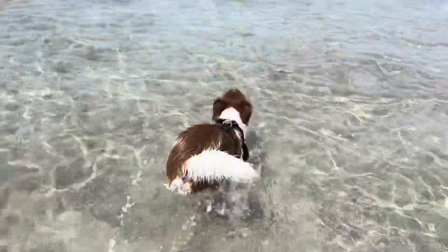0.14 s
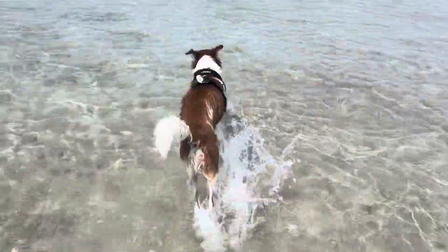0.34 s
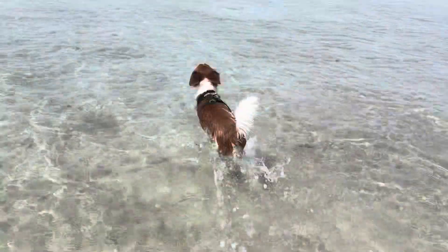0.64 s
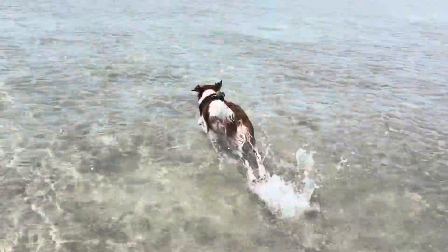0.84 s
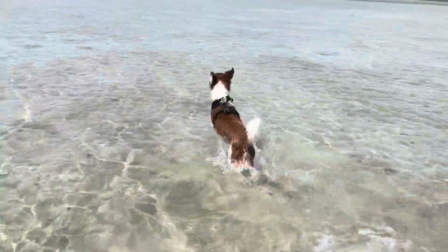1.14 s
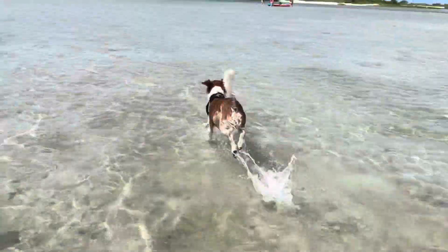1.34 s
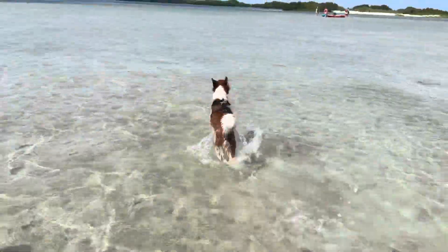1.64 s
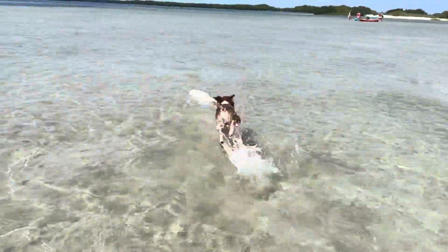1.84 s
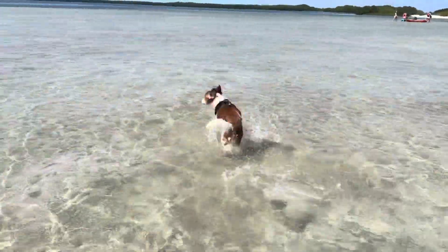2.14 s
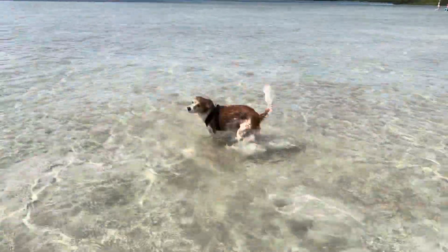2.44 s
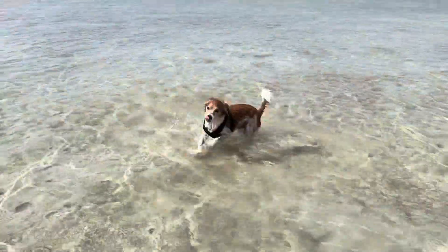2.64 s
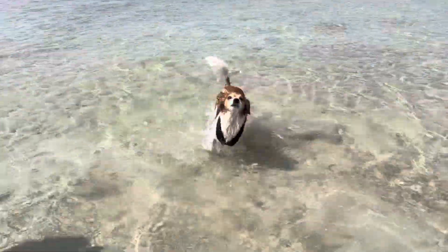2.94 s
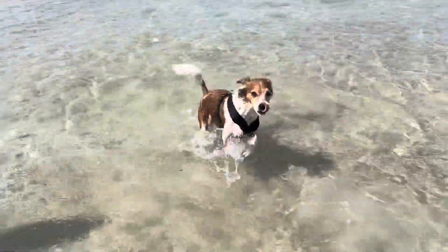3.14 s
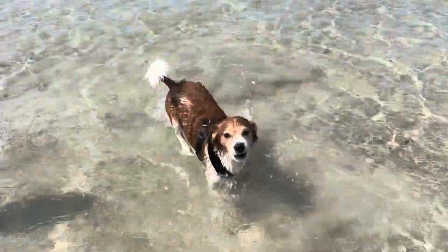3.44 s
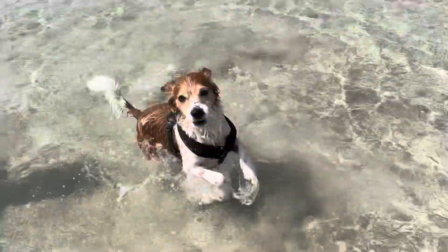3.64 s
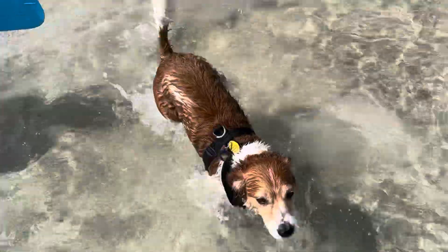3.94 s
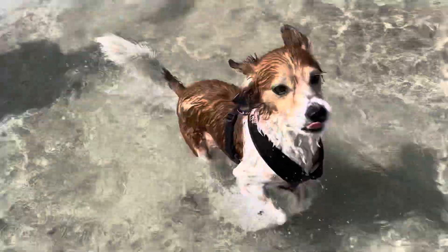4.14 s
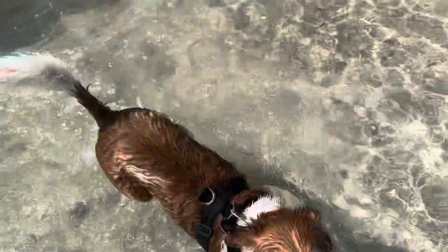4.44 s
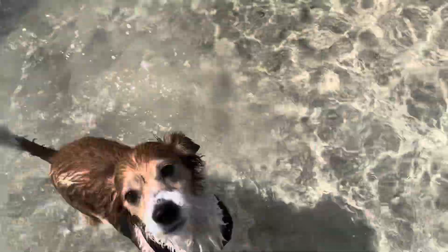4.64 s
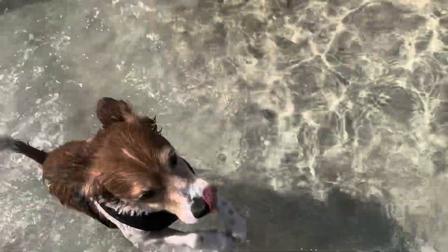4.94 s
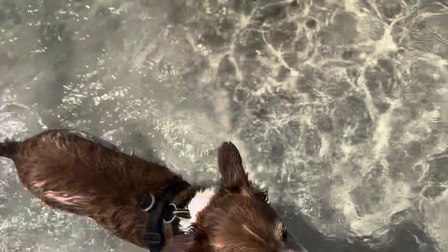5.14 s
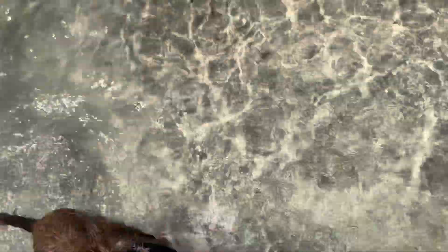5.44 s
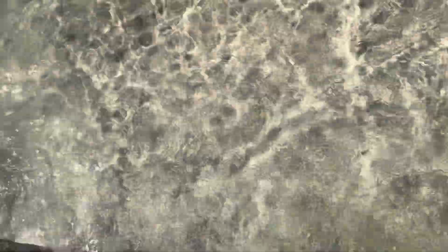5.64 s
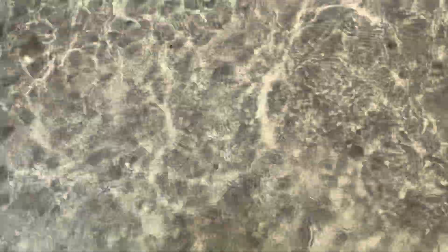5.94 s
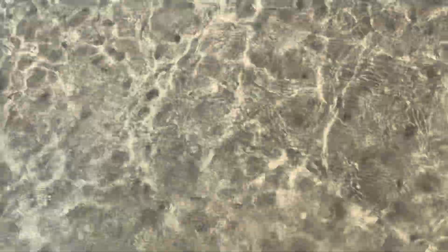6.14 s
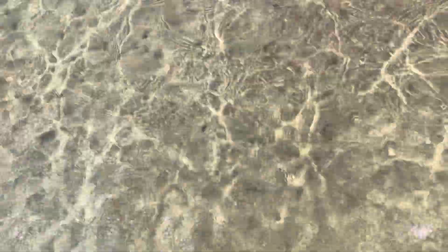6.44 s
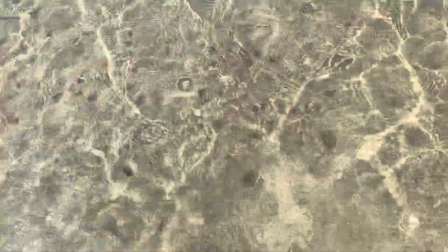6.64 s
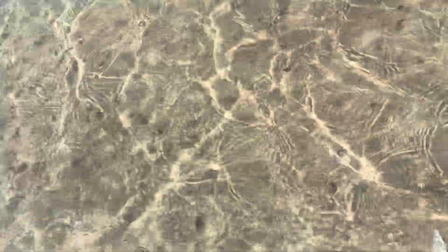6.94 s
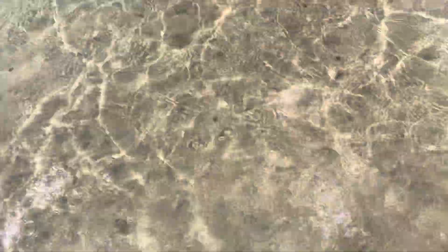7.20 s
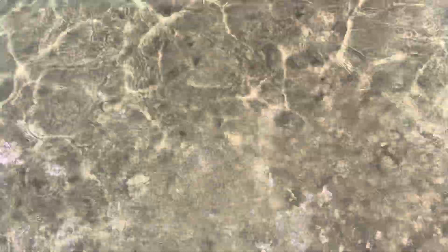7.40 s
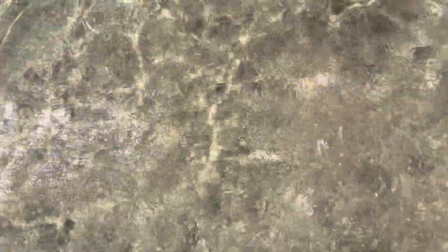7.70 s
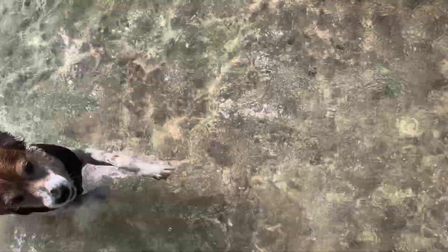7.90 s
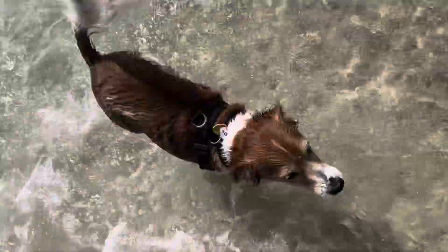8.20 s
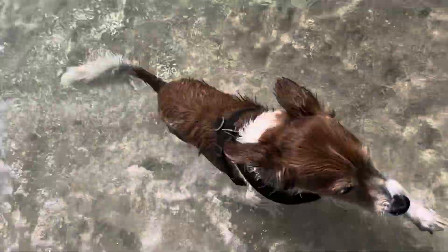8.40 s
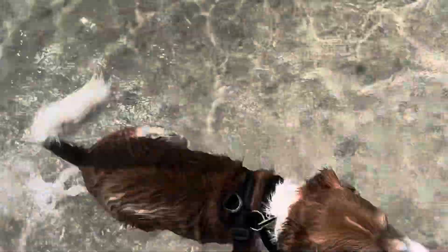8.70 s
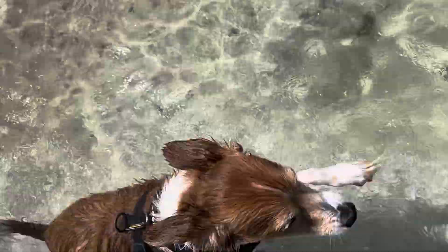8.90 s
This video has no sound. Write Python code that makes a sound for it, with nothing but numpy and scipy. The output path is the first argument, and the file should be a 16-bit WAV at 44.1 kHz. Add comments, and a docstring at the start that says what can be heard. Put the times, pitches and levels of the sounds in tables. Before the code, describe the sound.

A paw splash and a short low gust on the microphone open the scene. From 0.3 to 1.5 s a small dog trots through shallow sea water: quick gurgling sloshes, hollow plops rising slightly in pitch, light hissing spray, with little wind. Around 2 s the steps thin out to soft swishes. At 2.7 s a strong gust hits with hard, dull thumps, and rumbling, buffeting wind continues past 3.7 s. From 3.4 to 5.4 s strides splash closer and brighter, with plops and tiny drops; another heavy gust thumps at about 4.7 s. From 5.5 to 7.6 s regular, spray-rich strides alternate with lapping over steady low wind. Near 8 s gusts thump again, and from 8.1 to 8.8 s the splashing is densest, with crowded round plops and bright patter. Wet steps and lapping continue to the end at 9 s. Open air, no echo.

```python
"""A paw splash under a gust of wind opens; a small dog then trots on through shallow sea water.
Strides: swarms of ringing bubbles over surging noise, a low slosh and a bright spray that patters back.
Plops and drops: single air pockets, each a noisy slap and a short ring climbing in pitch.
Wind: coloured noise in gusts over a breeze, with single low thumps on the ports of a stereo microphone."""
import sys
import numpy as np
from scipy import signal
from scipy.fft import rfft, irfft
from scipy.io import wavfile

SR = 44100
rng = np.random.default_rng(int(sys.argv[2]) if len(sys.argv) > 2 else 0)


def master_out(mix):
    """Clip the mix to full scale and print it as 16-bit PCM to the path in sys.argv[1]."""
    frames = np.transpose(np.atleast_2d(mix))
    ceiling = np.clip(frames, -1, 1)
    pcm = np.round(ceiling * 32767).astype(np.int16)
    wavfile.write(sys.argv[1], SR, pcm)


N = 399546
HZ = np.maximum(np.fft.rfftfreq(N, 1 / SR), 1)  # transform grid, kept above 0 for the logarithm

# breeze between gusts: (time [s], rumble [dB], buffeting [dB])
BREEZE_CURVE = [(0, -36, -33), (.35, -33.5, -36), (.6, -46, -48.5), (1.3, -51, -36.5), (1.5, -42, -43.5),
                (2.4, -37.5, -33), (2.9, -28.5, -26.5), (4.2, -28.5, -31), (5.1, -27, -30), (5.6, -28, -33),
                (6.299, -30, -32.5), (7.501, -30, -39.5), (7.9, -37, -38), (8.3, -36, -28),
                (9.06, -29.5, -46)]
# gusts: (full from [s], build [s per 10 dB, floored in wind()], hold [s], rumble [dB], buffeting [dB])
GUST_EVENTS = [(0.104, 0, 0.012, -26, -24), (0.17, 0.2, 0.1, -25, -28), (0.763, -0.14, 0.019, -48, -31),
               (1.14, 0.2, 0.095, -44, -30.5), (1.676, 0.1, 0.025, -36, -30),
               (1.843, 0.5, 0.14, -39, -37.5), (2.493, -0.2, 0.03, -38, -29.5),
               (2.696, 0.05, 0.044, -23, -19), (2.924, 0, 0.12, -21, -24.5),
               (3.106, 0.05, 0.11, -28, -20.5), (3.301, 0, 0.2, -22, -41), (3.73, -0.01, 0.019, -22, -18.5),
               (3.947, 0.5, 0.027, -37, -29), (4.43, 0.2, 0.045, -22.5, -31),
               (4.688, -0.03, 0.024, -18.5, -19), (4.833, 0.2, 0.04, -22.5, -24),
               (5.366, 0.2, 0.015, -36, -25), (5.487, -3.5, 0.014, -21, -30), (5.827, 0.1, 0.18, -23, -27),
               (6.997, 0.13, 0.022, -24, -26.5), (7.725, 0.18, 0.028, -21, -25),
               (8.033, 0.07, 0.12, -20, -21.5), (8.265, 0.05, 0.087, -22, -20),
               (8.386, -0.2, 0.23, -22.5, -21.5), (8.707, 0.2, 0.047, -26, -28),
               (8.843, -0.9, 0.19, -25.5, -28)]
# wind spectra, rms set to 1 in use: (frequency [Hz], relative density [dB])
RUMBLE_SPECTRUM = [(22, -28), (32, -21), (45, 2), (80, 5), (130, -2.5), (250, -21)]
BUFFET_SPECTRUM = [(70, -15), (150, 0), (280, -1.5), (500, -4.5), (900, -16.5), (2000, -29)]
# single eddies thumping on the ports: (start [s], envelope peak before ports [dB], pitch [Hz])
THUMP_EVENTS = [(0.112, -13, 170), (0.125, -18.5, 198), (0.261, -19, 177), (2.689, -7.5, 304),
                (2.696, -2, 235), (2.712, -9, 200), (2.738, -9, 350), (2.877, -17, 240), (2.921, -13, 180),
                (2.964, -11.5, 160), (3.114, -13, 91.5), (3.189, -16, 128), (3.228, -9.5, 228),
                (3.281, -14, 187), (3.47, -13.5, 151), (3.735, -10, 94), (3.939, -17, 95),
                (4.822, -17, 198), (4.853, -7.5, 131), (8.025, -6, 107), (8.084, -6.5, 330),
                (8.101, -13, 107), (8.255, -9.5, 101), (8.266, -9, 110), (8.323, -10, 363),
                (8.442, -11.5, 368), (8.51, -19, 238), (8.572, -15, 105), (8.701, -18, 292),
                (8.891, -17, 326)]
# water lapping between strides, trims added in strides(): (time [s], slosh [relative dB], spray [relative dB])
LAPPING_CURVE = [(0, -37, -40), (1.2, -36, -46), (2.9, -34, -47.5), (3.4, -35, -49), (5.0, -36.5, -43),
                 (6.6, -30, -36.5), (7.3, -34.5, -41), (9.06, -31, -40)]
# strides, trims added in strides(): (full from [s], length [s], slosh [relative dB], spray [relative dB])
STRIDE_EVENTS = [(0.086, 0.052, -30.5, -34.5), (0.204, 0.13, -30, -42), (0.351, 0.03, -25.5, -36.5),
                 (0.628, 0.2, -31, -39.5), (0.848, 0.044, -39, -41), (0.968, 0.026, -32.5, -46),
                 (1.054, 0.063, -30, -38), (1.227, 0.066, -33.5, -56), (1.702, 0.019, -30, -41),
                 (1.496, 0.13, -29, -36.5), (2.053, 0.14, -29.5, -36.5), (2.656, 0.19, -34.5, -38.5),
                 (3.068, 0.036, -29, -55), (3.32, 0.045, -28.5, -37.5), (3.22, 0.19, -30, -32.5),
                 (3.418, 0.17, -33, -38.5), (3.626, 0.2, -31.5, -36.5), (3.879, 0.088, -32.5, -35),
                 (4.23, 0.22, -29, -31.5), (4.405, 0.11, -30.5, -34), (4.646, 0.16, -30, -38.5),
                 (4.848, .12, -35, -36), (5.242, 0.15, -31.5, -52), (5.478, 0.24, -31.5, -33.5),
                 (5.728, 0.089, -31, -58), (6.098, 0.23, -31.5, -33), (6.343, 0.053, -27, -34.5),
                 (6.543, 0.14, -36, -35), (6.817, 0.062, -32, -48), (7.097, 0.17, -32, -32),
                 (7.518, 0.15, -32, -34.5), (7.723, 0.051, -31, -33.5), (7.976, 0.24, -32.5, -34),
                 (8.109, 0.11, -28, -34.5), (8.48, .14, -29.5, -30.5), (8.591, 0.06, -27.5, -30),
                 (8.695, 0.061, -34.5, -37), (9.046, 0.14, -37, -32.5)]
# water spectra, shaping bubbles and hiss, rms set to 1 in use: (frequency [Hz], relative gain [dB])
SLOSH_SPECTRUM = [(200, -29), (400, -10.5), (700, -5.5), (1200, -4.5), (2000, -6), (2700, -13), (4000, -19)]
SPRAY_SPECTRUM = [(1200, -20), (2500, 0), (4000, -1.5), (6200, -6), (8500, -3), (10400, -1), (12000, -6.5),
                  (13500, -6.5), (15300, -4)]
# air pockets closed by a paw: (start [s], level before gain_db [dB], initial pitch [Hz], slap re ring [dB])
PLOP_EVENTS = [(0.097, -14, 920, 2.5), (0.16, -19, 899, 5), (0.177, -4, 574, -0.5), (0.334, -12, 1040, -7),
               (0.346, -6, 960, -10.5), (0.555, -9, 650, -3.5), (0.609, -6, 540, -24),
               (0.622, -6, 730, -15), (0.636, -6, 684, -7), (0.821, -12.5, 1190, -26),
               (0.854, -12, 1250, -8), (0.952, -6, 550, -23), (0.971, -9, 610, -3.5), (1.027, -9, 610, -16),
               (1.036, -12, 2100, -14), (1.039, -10, 604, 1), (1.202, -14, 635, -16),
               (1.213, -8.5, 530, -15), (1.332, -14, 1700, -13), (1.436, -17.5, 1000, 2),
               (1.471, -8.5, 1400, -9.5), (1.492, -11, 537, -11), (1.509, -8, 526, -8),
               (1.684, -15, 550, -9), (1.951, -5, 790, -13), (2.789, -10.5, 900, -8),
               (3.059, -12, 1140, -9), (2.907, -5.5, 507, -16.5), (3.011, -5.5, 537, -25),
               (3.415, -10, 674, 4), (3.737, -6.5, 590, -12), (3.778, -11.5, 660, -9.5),
               (3.828, -9, 587, -16), (3.879, -11, 1890, -15), (3.867, -7, 535, -4.5),
               (3.897, -14, 1500, -5), (3.921, -6.5, 540, -1.5), (3.954, -1, 690, -6),
               (4.384, -18, 1520, -9), (4.399, -9, 606, 4), (4.456, -7, 1600, -8), (4.464, -6, 1190, -8.5),
               (4.784, -11, 543, 3.5), (4.811, -5, 645, -2.5), (4.934, -11, 551, -5.5),
               (5.107, -6, 536, -7.5), (5.162, -11.5, 1250, -6), (5.199, -2.5, 1930, -18),
               (5.397, -12, 607, 0), (5.716, -5.5, 875, -22), (5.84, -6.5, 660, -7),
               (5.985, -10.5, 700, -5), (5.915, -6.5, 616, -6), (6.056, -14, 470, -14),
               (6.197, -11.5, 520, -15), (6.292, -4, 510, -6), (6.332, -5, 640, -12),
               (6.353, -13.5, 1490, 3), (6.401, -15, 1060, -2), (6.809, -14, 1140, -11),
               (7.729, -6.5, 776, -20), (8.085, -2, 533, -6), (8.123, -8.5, 495, -3),
               (8.319, -5, 501, -3.5), (8.336, -2, 556, -10), (8.345, -7, 630, -19),
               (8.384, -0.5, 597, -8.5), (8.429, -3, 520, -13), (8.442, -9, 524, 2), (8.547, -6, 644, -4),
               (8.58, -2.5, 546, -10), (8.594, -0.5, 570, -19), (8.613, -1, 700, -15),
               (8.694, -12, 540, -2), (8.739, -2, 497, -23), (8.788, -8, 1810, -22), (8.947, -2.5, 670, -9),
               (8.999, -7, 530, -5)]
# drops falling back close by: (start [s], level before gain_db [dB], initial pitch [Hz])
DROP_EVENTS = [(0.157, -11, 4360), (0.4727, -19, 2840), (1.976, -20, 3080), (3.4141, -15, 3480),
               (4.2058, -13, 8100), (4.2644, -7.5, 3220), (4.4, -13, 5000), (4.82, -20, 3420),
               (5.358, -16, 3100), (5.6582, -18, 3900), (5.88, -14, 2400), (6.172, -13, 3130),
               (6.35, -9, 4770), (6.8103, -13.5, 3930), (7.134, -11.5, 4100), (7.9794, -11, 6900),
               (7.9982, -15, 3200), (8.1053, -11, 3730), (8.5096, -11, 7060)]
# stereo balance: (frequency [Hz], left re right [dB], likeness [0-1])
PORT_BALANCE = [(60, -1, 0.92), (250, 0.5, 0.72), (450, -.5, 0.67), (1100, 0.5, 0.24), (1700, 1.5, 0.49),
                (2490, 2, 0.65), (3240, -5.5, 0), (3530, -3.5, 0.2), (5000, -4.5, 0.17), (5630, -2, 0),
                (7740, -1.5, 1), (10700, 0.5, 1)]
# set phase difference by frequency: (frequency [Hz], left against right [rad])
STEREO_PHASE = [(60, -.1), (1700, .1), (2600, -2.8), (3300, -.3), (8000, .3), (9300, 2.9), (10200, 3.3),
                (11900, 6.2), (13000, 6.5), (13900, 9.1), (15000, 9.4)]

GUST_FALL_S_PER_10_DB = 0.02
# shares of the stride length: 10 dB up, level, 10 dB down
STRIDE_RISE, STRIDE_HOLD, STRIDE_FALL = 1.1, 0.21, 0.68
PLOP_CYCLES_AT_600_HZ = 1.37  # nominal swell, scattered pocket by pocket
PLOP_PITCH_POWER = .85  # higher pockets ring more cycles
SPATTER_S = 0.012  # 1/e time of the spatter after a slap
STOPBAND_HZ = 16120


def from_db(db):
    """Decibels to amplitude gain."""
    return 10 ** (np.asarray(db) / 20)


def rms_one(x):
    """Scale to unit rms."""
    return x / np.sqrt(np.mean(x ** 2) + 1e-20)


def in_time(rows):
    """Columns of a curve table, sample by sample."""
    s, *columns = np.transpose(rows)
    return [np.interp(np.arange(N) / SR, s, column) for column in columns]


def in_hz(rows):
    """Columns of a frequency table on the transform grid, log-frequency interpolation."""
    hz, *columns = np.transpose(rows)
    return [np.interp(np.log(HZ), np.log(hz), column) for column in columns]


def colour(x, spectrum):
    """Shape by a spectrum, cut off beyond its ends; rms 1."""
    inside = (HZ > .7 * spectrum[0][0]) & (HZ < 1.5 * spectrum[-1][0])
    gain = from_db(in_hz(spectrum)[0]) * inside
    return rms_one(irfft(rfft(x) * gain, N))


def drift(corner_hz):
    """Slow chance: noise through two equal one-pole low-passes at SR / 20; rms 1."""
    r = np.exp(-40 * np.pi * corner_hz / SR)
    noise = rng.standard_normal(N // 20 + 2002)
    slow = signal.lfilter([1], [1, -2 * r, r * r], noise)[2000:]  # settling dropped
    return np.interp(np.arange(N) / 20, np.arange(len(slow)), rms_one(slow))


def swells(s, rise_s, hold_s, fall_s, levels_db, calm):
    """Event levels climb, hold and fall linearly in dB; powers add to a calm background."""
    t = np.arange(0, N + 32, 32)[:, None] / SR
    rising = (s - t) / rise_s
    falling = (t - s - hold_s) / fall_s
    below_db = 10 * np.maximum(0, np.maximum(rising, falling))
    totals_db = []
    for event_db, calm_db in zip(levels_db, in_time(calm)):
        coarse = np.sum(from_db(event_db - below_db) ** 2, axis=1)
        power = np.interp(np.arange(N) / SR, t[:, 0], coarse)
        totals_db.append(10 * np.log10(power + from_db(calm_db) ** 2))
    return totals_db


def thumps(cycles_at_150_hz):
    """A pressure lump of about a cycle or two, with a random share in the scattered view."""
    out, t = np.zeros((2, N + SR)), np.arange(4000) / SR
    chance = rng.random((len(THUMP_EVENTS), 2))
    for (s, peak_db, hz), (turn, lean) in zip(THUMP_EVENTS, chance):
        swell = t * hz / (cycles_at_150_hz * (hz / 150) ** 0.48)  # 1 at the envelope peak
        envelope = swell ** 2 * np.exp(2 - 2 * swell)
        lump = envelope * np.sin(2 * np.pi * (t * hz + turn))
        at = int(s * SR)
        out[:, at:at + 4000] += from_db(peak_db) * lump * [[1], [lean - .5]]
    return out[:, :N]


def wind():
    """Eddies hit the ports in lumps; the brighter buffeting is the lumpier."""
    s, build_s, hold_s, *levels_db = np.transpose(GUST_EVENTS)
    build_s = np.maximum(build_s, .005)
    rumble_db, buffet_db = swells(s, build_s, hold_s, GUST_FALL_S_PER_10_DB, levels_db, BREEZE_CURVE)
    eddies = drift(20)
    rumble_lumps = from_db(1.5 * eddies)
    buffet_lumps = from_db(np.minimum(3.0 * eddies + 3.3 * drift(58), 6.5))
    rumble = colour(rng.standard_normal((2, N)) * rumble_lumps, RUMBLE_SPECTRUM)
    buffet = colour(rng.standard_normal((2, N)) * buffet_lumps, BUFFET_SPECTRUM)
    gusts = from_db(rumble_db) * rumble + from_db(buffet_db) * buffet
    return gusts + thumps(cycles_at_150_hz=0.84)


def splats(per_s, decay_s):
    """Sheets of water land at random: a sudden rise, then exponential decay, capped."""
    landed = (rng.random(N) < per_s / SR) * np.minimum(rng.exponential(1, N), 1.6)
    dying = signal.lfilter([1], [1, -np.exp(-1 / (decay_s * SR))], landed)
    return np.minimum(dying, 1.6)


def bubbles(per_s, low_hz, high_hz, cycles, spread_db, count):
    """Random births ring a bank of resonators; two views, the shared and the scattered one."""
    born = rng.random(N) < per_s / SR
    sizes = born * from_db(spread_db * np.minimum(rng.exponential(1, N), 4))
    signs = rng.choice([-1, 1], (2, N))
    dealt = rng.integers(0, count, N)
    out = np.zeros((2, N))
    for k, hz in enumerate(np.geomspace(low_hz, high_hz, count)):
        r = from_db(-60 * hz / (cycles * SR))  # pole decays 60 dB in the given cycles
        w = 2 * np.pi * hz / SR
        resonance = [1 - r * r, 0, r * r - 1, 1, -2 * r * np.cos(w), r * r]
        clicks = sizes * signs * (dealt == k) + 1e-18
        out += signal.sosfilt([resonance, resonance], clicks) / np.sqrt(hz)  # twice: a soft start
    return rms_one(out)


def churn(level_db, spectrum, grains, bursts, hiss_db, surge_db, patchy_db):
    """Bubbles over the hiss of countless finer ones, which surges, bursts and flickers band by band."""
    white, surge = rfft(rng.standard_normal((2, N))), drift(13.0)
    edges = np.geomspace(spectrum[0][0] / 2, spectrum[-1][0] * 2, 9)
    hiss = np.zeros((2, N))
    for low, high in zip(edges, edges[1:]):
        band = irfft(white * (HZ >= low) * (HZ < high), N)
        hiss += band * from_db(surge_db * surge + patchy_db * drift(22.4))
    mix = grains + from_db(hiss_db) * hiss * (1 + bursts)
    return from_db(level_db) * colour(mix, spectrum)


def pockets(rows, rings, rise, slap_s, gain_db):
    """A closing air pocket: a noisy slap with spatter, and a ring that swells and climbs in pitch."""
    out, t = np.zeros((2, N + SR)), np.arange(2000) / SR
    chance = rng.random((len(rows), 3))
    noises = rng.standard_normal((len(rows), 2000))
    slap_envelope = t / slap_s * np.exp(1 - t / slap_s)
    spatter_envelope = 0.25 * (1 - np.exp(-t / slap_s)) * np.exp(-t / SPATTER_S)
    for (s, peak_db, hz, slap_db), cycles, (turn, lean, size), noise in zip(rows, rings, chance, noises):
        swell = t * hz / (cycles * (0.61 + 0.5 * size))  # 1 at the envelope peak
        phase = t * hz * (1 + rise * swell) + turn
        ring = swell * np.exp(1 - swell) * np.sin(2 * np.pi * phase)
        band = signal.butter(2, [hz, min(3.1 * hz, 15000)], "band", fs=SR, output="sos")
        slap = rms_one(signal.sosfilt(band, noise)) * (slap_envelope + spatter_envelope)
        pocket = from_db(peak_db + gain_db) * (ring + from_db(slap_db) * slap)
        at = int(s * SR)
        out[:, at:at + 2000] += pocket * [[1], [lean - .5]]
    return out[:, :N]


def strides():
    """Each stride and the lapping between: slosh and spray of bubbles, hiss and landing sheets."""
    s, length_s, *levels_db = np.transpose(STRIDE_EVENTS)
    slosh_db, spray_db = swells(s, STRIDE_RISE * length_s, STRIDE_HOLD * length_s,
                                STRIDE_FALL * length_s, levels_db, LAPPING_CURVE)
    swarms = from_db(4 * drift(14))  # bubbles come in swarms
    gurgle_per_s = 1200 * from_db(slosh_db + 33) * swarms
    patter_per_s = 1200 * from_db(spray_db + 40.5)
    gurgle = bubbles(gurgle_per_s, 250, 2600, cycles=19.0, spread_db=3.3, count=24)
    patter = bubbles(patter_per_s, 2016, 13940, cycles=22.6, spread_db=5.0, count=16)
    landings = splats(per_s=75, decay_s=0.0056)
    slosh = churn(slosh_db + 1.2, SLOSH_SPECTRUM, gurgle, .9 * landings,
                  hiss_db=1.0, surge_db=1.4, patchy_db=2.0)
    spray = churn(spray_db + 5.0, SPRAY_SPECTRUM, patter, 0.7 * landings,
                  hiss_db=4.0, surge_db=0.7, patchy_db=1.7)
    return slosh + spray


def plops_and_drops():
    """Pockets closed by a paw, low and varied in ring, and small high drops falling back."""
    plop_rings = [PLOP_CYCLES_AT_600_HZ * (row[2] / 600) ** PLOP_PITCH_POWER for row in PLOP_EVENTS]
    plops = pockets(PLOP_EVENTS, plop_rings, rise=0.021, slap_s=0.0015, gain_db=-10.0)
    drop_rows = [(*drop, -5) for drop in DROP_EVENTS]  # slap 5 dB below the ring
    drop_rings = np.full(len(drop_rows), 4.2)
    drops = pockets(drop_rows, drop_rings, rise=0.012, slap_s=0.0013, gain_db=-8.5)
    return plops + drops


def ports(pair):
    """Shared and scattered sound become left and right, with balance and a set phase difference."""
    balance_db, alike = in_hz(PORT_BALANCE)
    alike = np.clip(alike, 0, 1)
    shared, scattered = rfft(pair)
    shared = np.sqrt(1 + alike) * shared
    scattered = np.sqrt(1 - alike) * scattered
    half = from_db(balance_db / 2) * np.exp(.5j * in_hz(STEREO_PHASE)[0])
    left, right = (shared + scattered) * half, (shared - scattered) / half
    return irfft(np.array([left, right]), N) / np.sqrt(2)


def scene():
    """Wind and water at the microphone ports."""
    return ports(wind() + strides() + plops_and_drops())


def record(dry):
    """Soft-clip peaks toward 0.95, then low-pass: 70 dB down from the stopband edge."""
    rounded = .95 * np.tanh(dry / .95)
    low_pass = signal.cheby2(20, 70, STOPBAND_HZ, fs=SR, output="sos")
    return signal.sosfilt(low_pass, rounded)


dry = scene()
out = record(dry)
master_out(out)
```